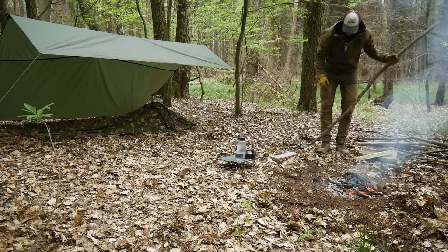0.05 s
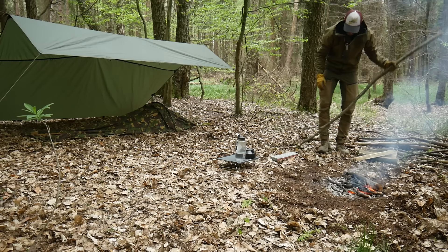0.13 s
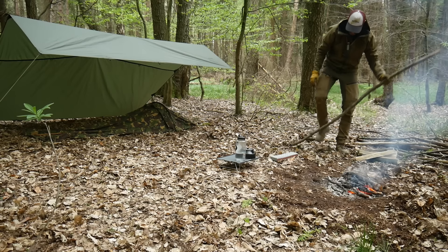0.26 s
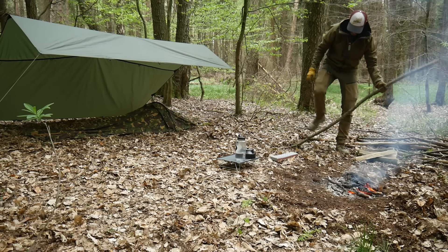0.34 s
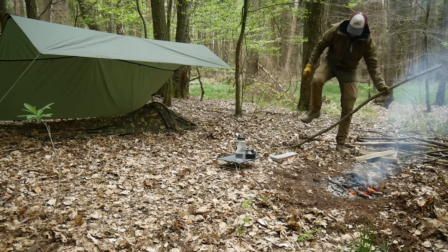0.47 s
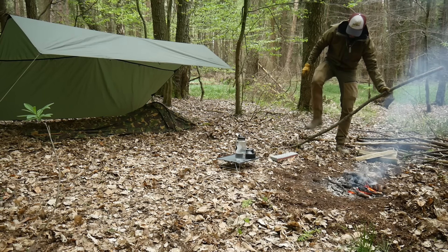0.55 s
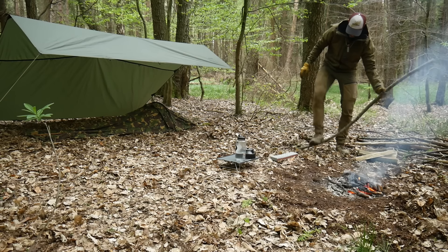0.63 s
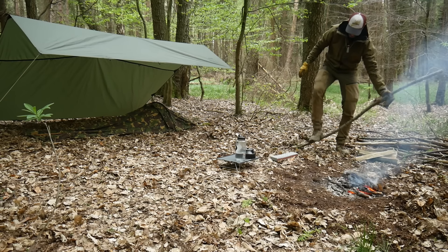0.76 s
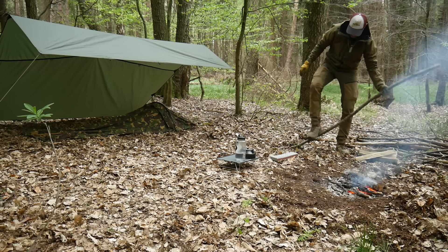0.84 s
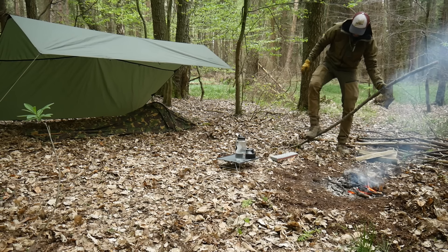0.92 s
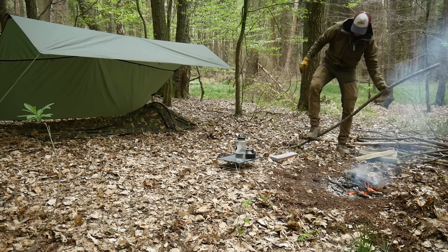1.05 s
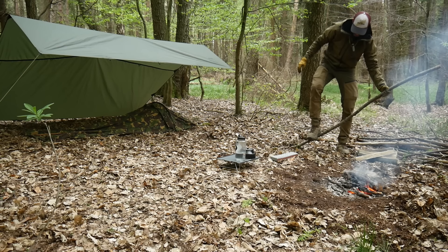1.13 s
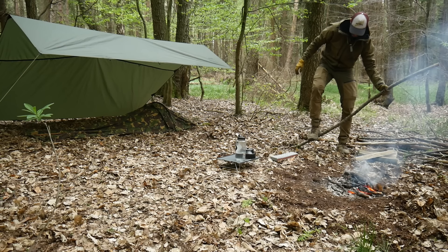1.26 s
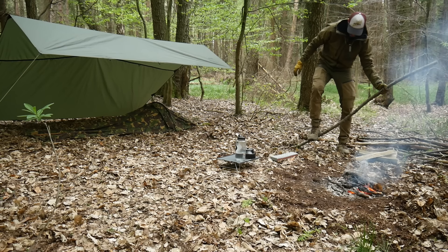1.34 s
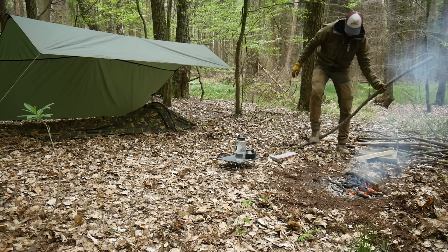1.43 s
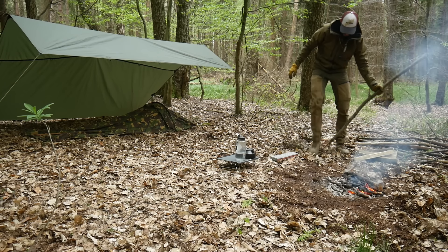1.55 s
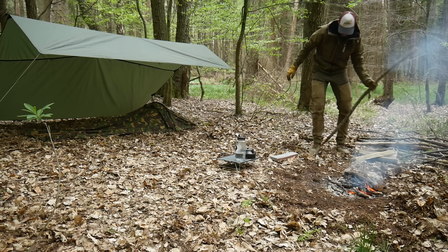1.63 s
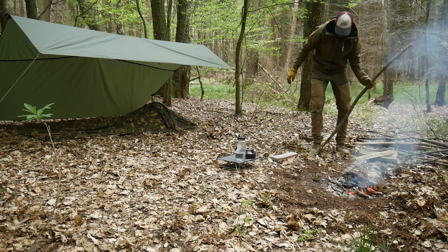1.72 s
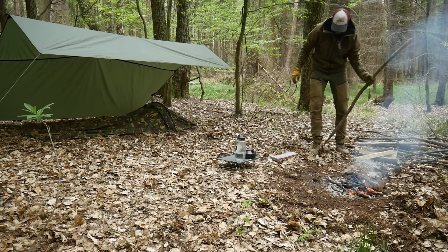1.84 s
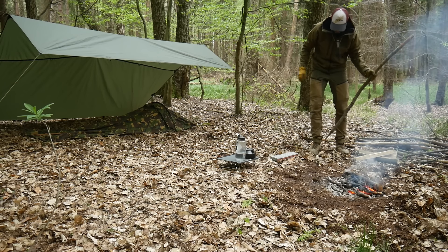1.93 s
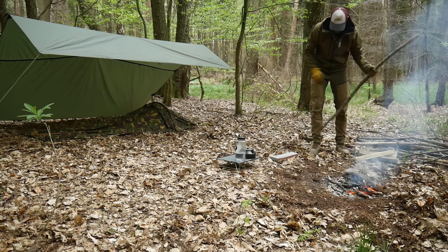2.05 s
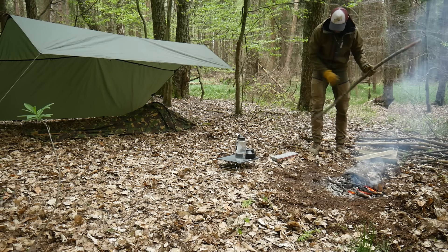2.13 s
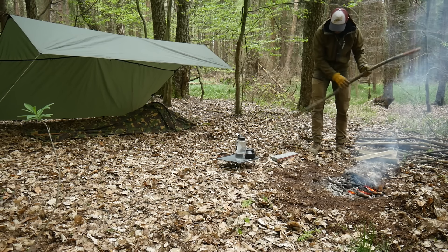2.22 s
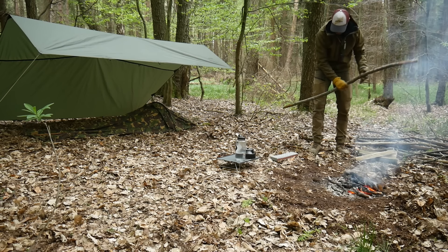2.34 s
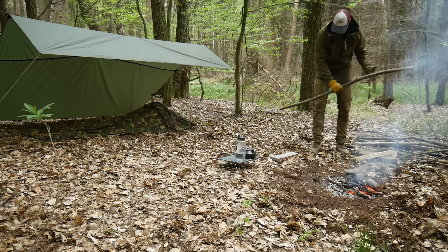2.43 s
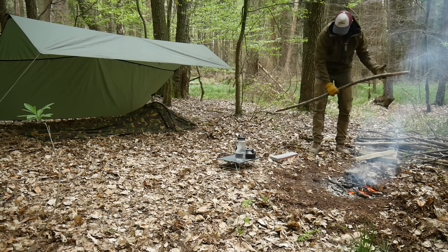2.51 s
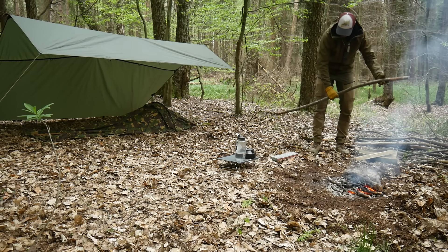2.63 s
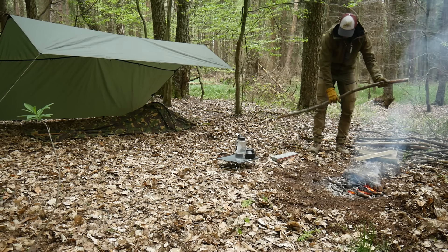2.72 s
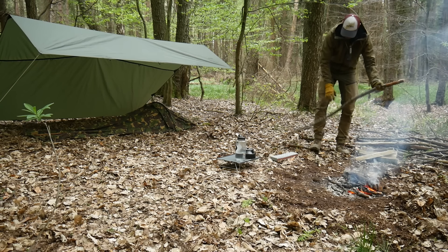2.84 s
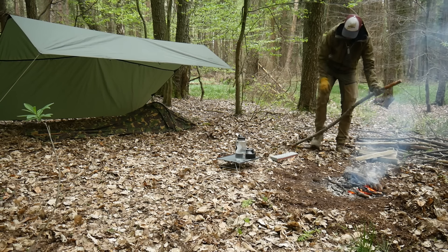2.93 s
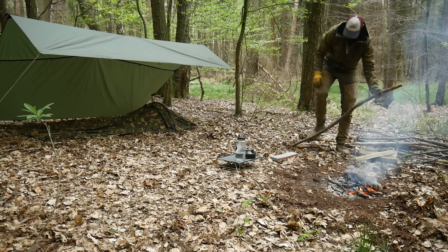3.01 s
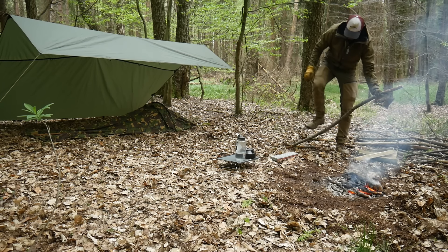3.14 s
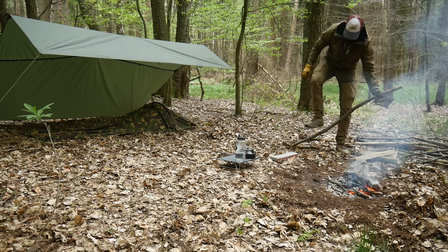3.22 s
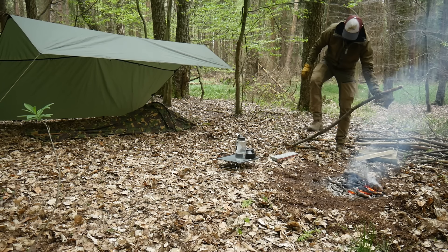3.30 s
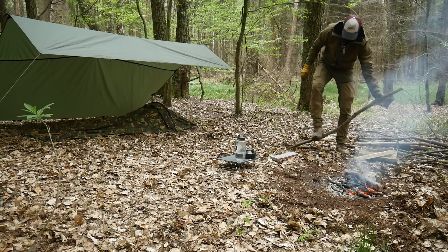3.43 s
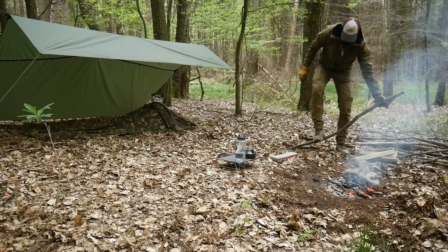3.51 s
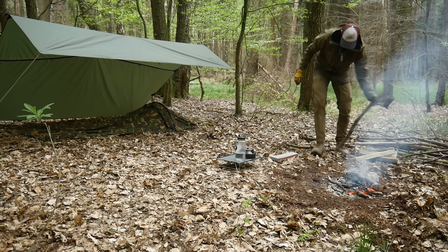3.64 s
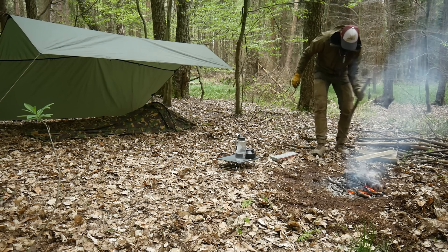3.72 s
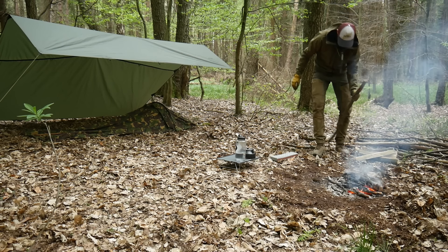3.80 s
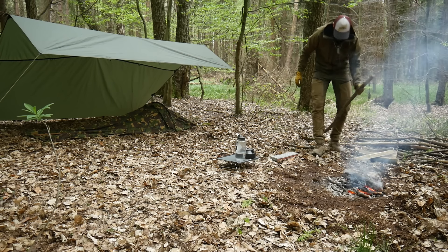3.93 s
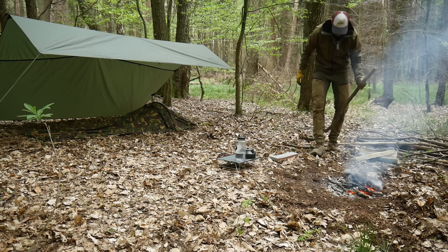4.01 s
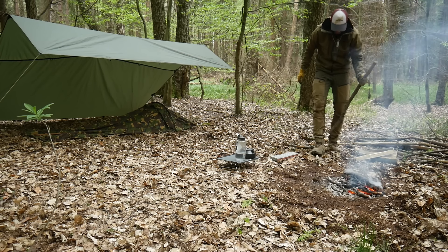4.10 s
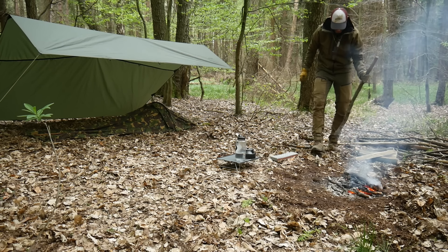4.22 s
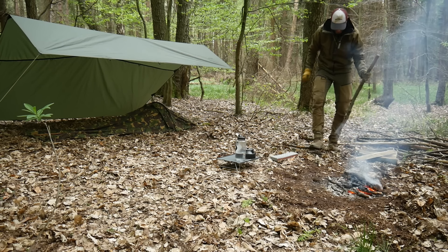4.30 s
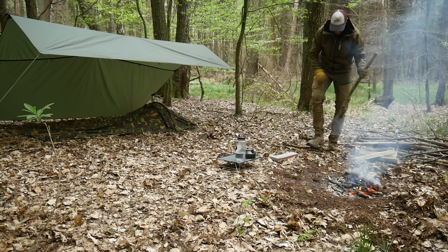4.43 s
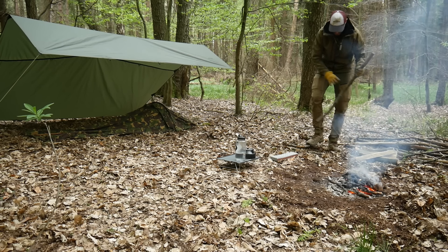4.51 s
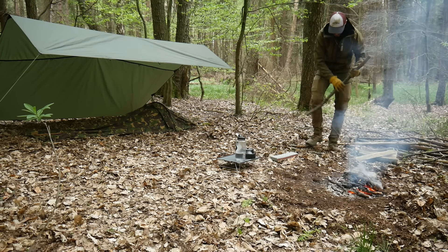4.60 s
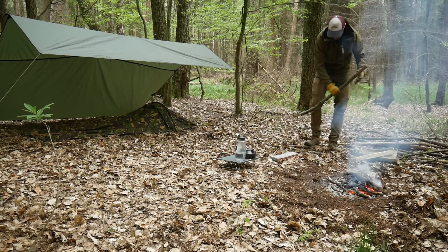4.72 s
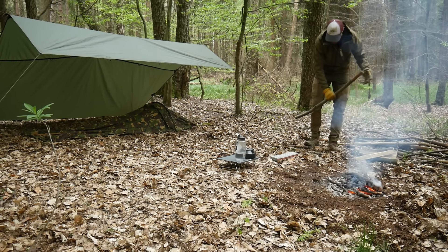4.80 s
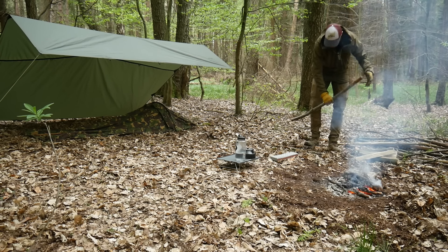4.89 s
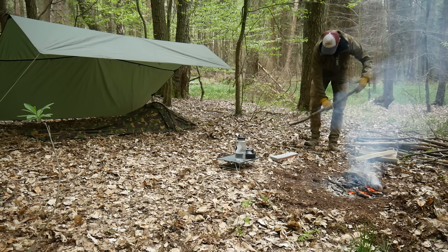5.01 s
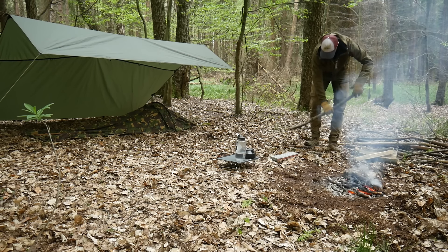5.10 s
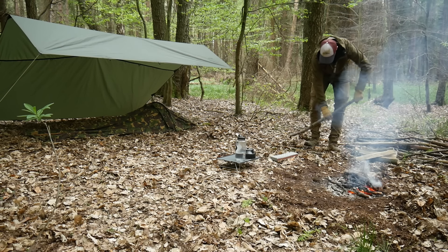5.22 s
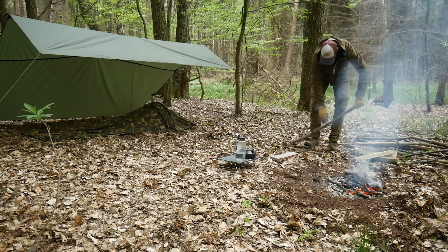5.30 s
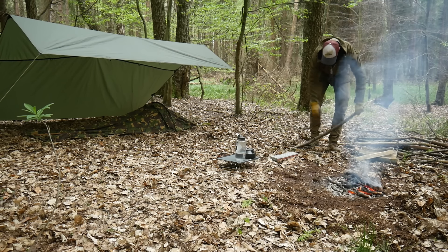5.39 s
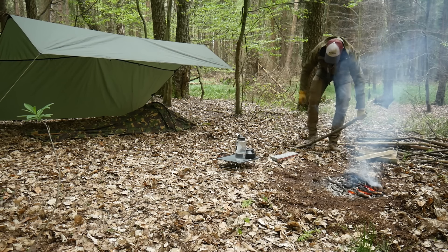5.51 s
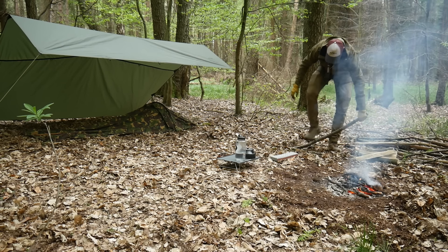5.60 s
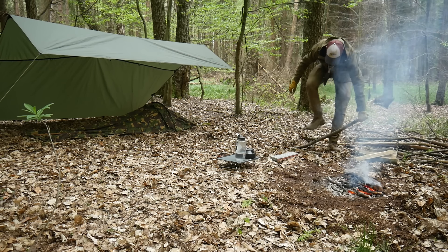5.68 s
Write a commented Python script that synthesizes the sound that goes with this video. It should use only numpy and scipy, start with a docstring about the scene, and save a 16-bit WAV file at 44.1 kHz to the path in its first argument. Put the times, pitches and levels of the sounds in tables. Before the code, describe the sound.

Crisp leaf crackle and a cluster of twig clicks lead to a very loud, dry branch snap that distorts the microphone and rings through the forest. Quieter rustling follows under a small far-off bird's dipping notes and peeps. A second sharp break answers, then footsteps in leaves, light ticks and one last brighter click, over a very soft outdoor air noise.

```python
"""Forest camp: a dry branch is snapped twice under a boot, metres from a microphone whose input overloads.
Leaves shuffle as coloured clicks and noise; twigs tick as noise bursts with a sine ring; boots thud as sagging sines.
A small bird sings V-shaped near-sine notes and short peeps. The snaps ring the broad modes of the branch.
Decaying noise makes the echo from the trunks; steady coloured noise is the air."""
import sys
import numpy as np
from scipy import signal
from scipy.fft import rfft, irfft
from scipy.io import wavfile

SR = 44100
rng = np.random.default_rng(int(sys.argv[2]) if len(sys.argv) > 2 else 0)


def wrap_up_sound(samples):
    """Save the sound to the file named by the first command line argument, as 16-bit audio."""
    columns = np.atleast_2d(samples).T
    # keep every value between -1 and 1, then stretch to whole-number steps
    tamed = np.clip(columns, -1, 1)
    steps = np.round(tamed * 32767).astype(np.int16)
    wavfile.write(sys.argv[1], SR, steps)


N = 253575


def undb(db):
    """Amplitude ratio of a level in dB."""
    return 10 ** (np.asarray(db) / 20)


def level(x, db):
    """Scale x to an rms level in dB."""
    return x * undb(db) / np.sqrt(np.mean(x ** 2))


def colour(x, points):
    """Causal filter that follows (Hz, dB) points, from the folded cepstrum."""
    hz, db = np.transpose(points)
    grid_hz = np.maximum(np.arange(2049) * SR / 4096, 1)
    gain_db = np.interp(np.log(grid_hz), np.log(hz), db)
    cepstrum = irfft(np.log(undb(gain_db)))
    cepstrum[1:2048] *= 2
    cepstrum[2049:] = 0
    impulse = irfft(np.exp(rfft(cepstrum)))
    return signal.fftconvolve(x, impulse)[:len(x)]


def band(x, hz, width_hz):
    """One resonance, gain 1 at its centre."""
    b, a = signal.iirpeak(min(hz, 0.45 * SR), hz / width_hz, fs=SR)
    return signal.lfilter(b, a, x)


def fade(t, t60_s):
    """Exponential decay, 60 dB down after t60_s."""
    return np.exp(-np.log(1000) * t / t60_s)


def add(out, start_s, x):
    """Mix x into out, cut at the end."""
    i = int(start_s * SR)
    out[i:i + len(x)] += x[:len(out) - i]


def grains(count, per_s, spread_db):
    """Random clicks, many small and few large; rms 1."""
    hit = rng.random(count) < per_s / SR
    size = np.minimum(rng.exponential(size=count), 3)
    clicks = hit * rng.standard_normal(count) * undb(spread_db * size)
    return level(clicks + 1e-9, 0)


# Spectrum of the forest air. Each row: frequency in Hz, relative level in dB.
AIR_SPECTRUM = [(18, -16), (30, -8), (65, -4.5), (118, -6), (153, -8), (259, -12.5), (473, -11.5),
                (616, -3.5), (666, -8), (1910, -17), (2060, -11.5), (2230, -17), (6000, -21.5),
                (16000, -25)]
AIR_RMS_DB = -65


def air():
    """Steady noise of the open forest, strongest in the bass and near 600 Hz."""
    return level(colour(rng.standard_normal(N), AIR_SPECTRUM), AIR_RMS_DB)


LEAF_FLICKER_DB, LEAF_FLICKER_HZ = 1, 25


def flicker():
    """Gain that wanders at random: leaves give way unevenly."""
    wander = band(rng.standard_normal(N), LEAF_FLICKER_HZ, 2 * LEAF_FLICKER_HZ)
    return undb(level(wander, 0) * LEAF_FLICKER_DB)


# Shuffles in dead leaves. Each row: peak time in seconds, crackle level in dB, swish level in dB,
# seconds to swell by 20 dB, seconds to die by 20 dB before the layer's stretch (both at least 2 ms).
SHUFFLE_EVENTS = [(0.0, -57.5, -59, .1, 0.2), (.206, -60, -61.5, 0.07, 0.27), (.47, -58.5, -59, 0.4, 0.21),
                  (.608, -66.5, -60, -0.04, 0), (.659, -54, -47, .005, 0.05), (.69, -47, -60, 0.02, 0.05),
                  (.72, -45, -50.5, 0.04, 0.0848), (0.857, -47.5, -61, -0.03, 0.0043),
                  (.946, -66, -63, 0.2, 0), (1.082, -70.5, -68.5, 1, 0.33), (1.53, -66, -66, -0.1, 1.2),
                  (1.585, -61, -63, 0.01, 0), (1.95, -59, -56, 0.05, 0.2), (2.012, -52.5, -59, 0, .02),
                  (2.05, -66, -57, -0.08, 0.46), (2.377, -56.5, -55, 0.68, .07),
                  (2.57, -52, -58.5, 0.06, 0.22), (2.777, -67.5, -62.5, 0.5, .13),
                  (2.876, -63.5, -61, .06, .5), (2.99, -49.5, -53.5, .025, 0.1),
                  (3.115, -57, -58.5, 0.18, 0.12), (3.39, -64.5, -59, 0.16, 0.24),
                  (3.453, -54.5, -57.5, 0.13, -0.3), (3.56, -60.5, -67.5, 0.3, 0.3),
                  (3.64, -59, -65.5, -0.3, -1.8), (3.722, -52.5, -47.5, 0.04, 0.21),
                  (3.85, -61, -60.5, 0.04, 0.4), (3.976, -48.5, -52, 0, 0.27),
                  (4.14, -58, -59.5, 0.96, -0.23), (4.238, -66, -60.5, -0.06, 0.8),
                  (4.31, -61, -76, -0.3, 0.15), (4.423, -59.5, -59.5, 0.2, 0.52),
                  (4.668, -48, -53.5, 0.05, 0.09), (4.709, -51.5, -55, 0.06, 0.05),
                  (4.85, -57.5, -62, 0.15, 0.12), (4.9, -55.5, -58, 0.1, 0.09),
                  (5.12, -72, -62.5, 0.1, 0.2), (5.22, -65.5, -64.5, 0.2, -0.1),
                  (5.3, -61.5, -60, .1, -0.24), (5.434, -63.5, -62, 0.53, 0.5), (5.556, -56, -62, 0, 0.1),
                  (5.59, -64.5, -64, .05, 0.5)]


def shuffling(column, die_stretch):
    """Gain of one leaf layer: every shuffle swells to its peak and dies away; their powers add."""
    t, power = np.arange(0, N + 32, 32) / SR, 0
    for row in SHUFFLE_EVENTS:
        peak_s = row[0]
        swell_s, die_s = np.maximum(row[3:], 0.002) * (1, die_stretch)
        drop = np.where(t < peak_s, (peak_s - t) / swell_s, (t - peak_s) / die_s)
        power = power + undb(row[column] - 20 * drop) ** 2
    return np.interp(np.arange(N) / SR, t, np.sqrt(power)) * flicker()


def leaf_bits(sizes_hz, per_s):
    """Leaf bits of each size crack on their own, every click with a narrow colour."""
    total = 0
    for hz in sizes_hz:
        clicks = band(grains(N, per_s, spread_db=1.0), hz, 0.83 * hz)
        total = total + level(clicks, 10 * np.log10(hz / sizes_hz[-1]))
    return total


# Colour filters of the two leaf layers. Each row: frequency in Hz, relative gain in dB.
CRACKLE_COLOUR = [(500, -26), (1500, -16.5), (3500, -3.5), (5500, -3.5), (8000, -4.5), (10300, -7.5),
                  (13000, -5.5), (16000, -10.5)]
SWISH_COLOUR = [(100, -24.5), (250, -9.5), (600, -3), (900, -2.5), (2000, -5.5), (4000, -8.5),
                (8000, -25.5)]
CRACKLE_DIE_STRETCH, SWISH_DIE_STRETCH = 0.88, 1.6


def leaves():
    """Dense crackle of dry leaves over a duller swish; both follow the boots."""
    crackle = 0.64 * leaf_bits((2560, 4470, 8000, 13300), 620) + 0.67 * rng.standard_normal(N)
    swish = 0.3 * leaf_bits((500, 900, 1600, 2800), 200) + rng.standard_normal(N)
    crackle = shuffling(1, CRACKLE_DIE_STRETCH) * level(colour(crackle, CRACKLE_COLOUR), 0)
    swish = shuffling(2, SWISH_DIE_STRETCH) * level(colour(swish, SWISH_COLOUR), 0)
    return crackle + swish


# Twigs, splinters and leaf stalks breaking. Each row: start in seconds, peak in dB, centre in Hz,
# treble edge in dB before peak scaling, crack t60 in seconds.
TICK_EVENTS = [(0.6038, -35.5, 1540, -25, 0.0082), (0.656, -25, 1140, -5.5, 0.01),
               (0.6594, -24.5, 5300, 1, 0.0084), (0.6693, -29, 7300, 2, 0.01), (0.686, -33, 7300, -2, .008),
               (0.705, -23, 8350, -23, 0.0055), (0.7132, -22, 7600, -10, 0.0085),
               (0.7176, -22.5, 3800, -5, 0.0079), (0.724, -30, 6980, -8, .0045),
               (0.7352, -15.5, 7320, -14, .003), (0.7563, -33.5, 7740, -3, .007),
               (0.8606, -27.5, 3020, -21, 0.015), (0.9224, -46, 9250, -12, .008),
               (1.05, -49, 3920, -6, .009), (1.0818, -39.5, 1060, -4.5, 0.015),
               (1.281, -53, 3550, -12, .008), (1.345, -50, 4560, -14, .005),
               (1.377, -43.5, 3760, -2, 0.0085), (1.41, -54, 4000, -14, .005),
               (1.495, -50, 2540, -23, 0.017), (1.5788, -34, 780, 10, 0.0065),
               (1.5985, -15, 5600, -21, .0055), (1.6066, -2, 2340, -21, 0.0079),
               (1.6298, -15, 3000, 1, .008), (1.6339, -4.5, 2440, -10, 0.0036),
               (1.909, -30, 3930, -9, 0.021), (1.9088, -29.5, 1340, -9.5, 0.025),
               (1.948, -39, 1440, -5.5, .008), (2.0113, -46.5, 2070, 5, 0.0053),
               (2.333, -43.5, 876, -18, 0.029), (2.344, -46.5, 900, -28, 0.02),
               (2.777, -40, 3880, -17, 0.0067), (2.9335, -32.5, 3975, -14, 0.0057),
               (2.975, -26.5, 1770, -32, 0.018), (2.9802, -12.5, 2570, 2.5, 0.01),
               (3.1072, -39, 4530, -8.5, 0.0085), (3.3834, -38.5, 2070, -19, .007),
               (3.6758, -16, 1800, -5, 0.011), (3.7133, -18, 7950, -1, 0.0065),
               (3.7357, -22, 1960, -16, 0.011), (3.7643, -28.5, 2080, -19, 0.011),
               (4.0865, -35, 3356, -11, 0.011), (4.099, -39, 1965, -4.5, .008), (4.108, -39, 998, -5, .01),
               (4.128, -40, 693, -23, .012), (4.149, -41, 1002, -21, .015), (4.241, -39, 6140, -3, 0.0053),
               (4.2644, -42.5, 3990, -15, .008), (4.3089, -41, 8620, -5, .008),
               (4.645, -37, 1000, -7, .008), (4.669, -41, 7990, -8, 0.0087),
               (4.783, -40.5, 8580, -3.5, 0.0056), (4.8029, -38.5, 7910, 0, .008),
               (5.2031, -40, 3310, -9, 0.019), (5.243, -43.5, 7970, 1, 0.013),
               (5.435, -44, 1506, -12, .015), (5.438, -42.5, 1200, -19, .015),
               (5.5502, -20, 3620, 10.5, 0.011), (5.5497, -35, 850, -2, .013)]
FAINT_COUNT, FAINT_DB, FAINT_SPREAD_DB = 30, -53, 3
FAINT_HZ, FAINT_OCTAVES, FAINT_TREBLE_DB, FAINT_T60_S = 4000, 0.5, -12, 0.006


def ticks():
    """A sharp crack with a crumbling tail rings the stalk, with a bright edge; faint ones fall anywhere."""
    out, t = np.zeros(N), np.arange(SR // 20) / SR
    faint = []
    for _ in range(FAINT_COUNT):
        a, b = rng.standard_normal(2)
        db, hz = FAINT_DB + FAINT_SPREAD_DB * a, FAINT_HZ * 2 ** (FAINT_OCTAVES * b)
        faint.append((rng.random() * N / SR, db, hz, FAINT_TREBLE_DB, FAINT_T60_S))
    for start_s, db, hz, treble_db, t60_s in TICK_EVENTS + faint:
        fall = fade(t, np.clip(t60_s, 0.002, 0.06))
        crack = rng.standard_normal(len(t)) * fall
        crack[0] = 4.0  # sharp onset
        ring = level(np.sin(2 * np.pi * hz * t) * fall ** 1.5, -2)
        body = level(band(band(crack, hz, 1.3 * hz), hz, 1.3 * hz), -2.3)
        edge = level(band(crack, 10500, 11000), treble_db)
        tick = ring + body + edge
        add(out, start_s, undb(db) * tick / np.abs(tick).max())
    return out


# Boot and stick ends on soft ground. Each row: start in seconds, level in dB, pitch sagged to in Hz.
THUD_EVENTS = [(0.606, -48, 462), (0.659, -34.5, 250), (0.906, -50, 483), (1.082, -54.5, 450),
               (1.521, -54.5, 179), (1.588, -16, 454), (1.618, -25.5, 348), (1.651, -34.5, 289),
               (1.91, -48, 450), (1.99, -56, 450), (2.51, -58, 280), (2.94, -44.5, 171), (2.96, -49, 196),
               (2.978, -41.5, 580), (3.384, -41.5, 217), (3.472, -44.5, 201), (3.657, -26.5, 333),
               (3.696, -35, 370), (3.709, -28.5, 257), (4.107, -54, 500), (4.15, -56, 490),
               (4.188, -49, 476), (4.241, -53, 496), (4.626, -50, 280.6), (5.551, -41.5, 300)]
THUD_T60_S, SAG_S = 0.038, 0.0028


def thuds():
    """A soft push into the ground: a few cycles that sag in pitch, over a duller shove."""
    out, t = np.zeros(N), np.arange(SR // 5) / SR
    for start_s, db, hz in THUD_EVENTS:
        turns = hz * (t + 0.002 * (1 - np.exp(-t / SAG_S)))
        push = np.sin(2 * np.pi * turns)
        shove = 0.43 * np.sin(2 * np.pi * 0.45 * turns)
        add(out, start_s, undb(db) * fade(t, THUD_T60_S) * (push + shove))
    return out


def tone_db(hz, tilt_db_per_octave, lift_hz, lift_db):
    """Colour of one break: a tilt and a narrow lift that depends on the piece that comes off."""
    lift = lift_db * np.exp(-5 * np.log2(hz / lift_hz) ** 2)
    return tilt_db_per_octave * np.log2(hz / 2500) + lift


# Forest echo by band. Each row: centre in Hz, near trunks t60 in seconds, near level in dB,
# far trunks t60 in seconds, far level in dB (levels before the fade).
FOREST_BANDS = [(89, 0.1, -56, 0.57, -74.5), (183, 0.18, -41, 0.59, -62.5), (340, 0.24, -28.5, 1.5, -58.5),
                (650, 0.09, -20, 1, -43.5), (974, 0.26, -20, 0.17, -36.5), (1530, .2, -12, 1.3, -34.5),
                (2220, 0.22, -12.5, 1.3, -33), (3500, 0.22, -10, 1.1, -32.5),
                (5198, 0.36, -14.5, 0.14, -29.5), (7900, 0.32, -18.5, 0.6, -30),
                (13200, 0.067, -23, .3, -38.5)]


def forest(*tone):
    """Echo of one crack: near trunks return grainy echoes, far ones a smooth wash."""
    t, echo = np.arange(3 * SR // 2) / SR, 0
    near = 0.6 * grains(len(t), 1200, spread_db=2.5) + rng.standard_normal(len(t))
    far = rng.standard_normal(len(t))
    for hz, near_t60_s, near_db, far_t60_s, far_db in FOREST_BANDS:
        for scatter, t60_s, db in ((near, near_t60_s, near_db), (far, far_t60_s, far_db)):
            part = band(band(scatter, hz, 0.9 * hz), hz, 0.9 * hz)
            echo = echo + level(part, db + tone_db(hz, *tone)) * fade(t, t60_s)
    return echo * np.clip(t / 0.008, 0, 1)  # the first trunk stands a step away


# V-shaped notes. Each row: time of the lowest point in seconds, lowest pitch in Hz,
# falling leg in dB, rising leg in dB, length relative to the note shape.
BIRD_NOTES = [(2.488, 2200, -50.5, -51, 0.78), (2.636, 2230, -50.5, -53, 0.67),
              (2.769, 2310, -51, -59, 0.62), (2.905, 2330, -51, -56.5, 0.74), (3.044, 2340, -51, -53, .75),
              (3.184, 2200, -52, -51.5, .85), (3.336, 2120, -50.5, -50.5, 1.05),
              (3.487, 2076, -51.5, -51.5, 1.05), (3.585, 2050, -52, -75.5, 1.23),
              (3.648, 2180, -56.5, -74, .9)]
# Shape of one note. Each row: seconds from the lowest point at length 1, pitch over the lowest as a ratio,
# level in dB.
NOTE_SHAPE = [(-.03, 1.55, -20), (-.022, 1.42, -8), (-.012, 1.28, 0), (0, 1., -13), (.008, 1.28, -2),
              (.018, 1.44, -3), (.03, 1.5, -8), (.036, 1.5, -20)]


def bird_notes():
    """Near-sine notes that fall and rise again; foliage on the way makes them flutter."""
    out, (shape_s, ratio, shape_db) = np.zeros(N), np.transpose(NOTE_SHAPE)
    for low_s, hz, fall_db, rise_db, length in BIRD_NOTES:
        t = np.arange(shape_s[0], shape_s[-1], 1 / (SR * length))
        phase = 2 * np.pi * np.cumsum(hz * np.interp(t, shape_s, ratio)) / SR
        leg_db = np.interp(t, [-0.003, 0.003], [fall_db, rise_db])
        db = np.interp(t, shape_s, shape_db) + leg_db
        add(out, low_s + shape_s[0] * length, np.sqrt(2) * undb(db) * np.sin(phase))
    return out * (1 + level(band(rng.standard_normal(N), 90, 150), -12))


# Short high notes. Each row: start in seconds, nominal pitch in Hz, level in dB before the bird's mix.
PEEP_NOTES = [(1.496, 4330, -67.5), (2.435, 3800, -58), (2.59, 3820, -53.5), (2.716, 4450, -57.5),
              (2.772, 3800, -54), (2.863, 3860, -58), (2.996, 4210, -54), (3.126, 4250, -60.5),
              (3.149, 3770, -55), (3.284, 4330, -59), (3.299, 3760, -57), (3.433, 3810, -57)]
PEEP_S = 0.04


def bird_peeps():
    """Short high sines that each sag and warble."""
    out, u = np.zeros(N), np.arange(0, 1, 1 / (PEEP_S * SR))
    for start_s, hz, db in PEEP_NOTES:
        bend = 1.08 - 0.17 * u + 0.062 * np.sin(25 * u)
        phase = 2 * np.pi * np.cumsum(hz * bend) / SR
        add(out, start_s, np.sqrt(2) * undb(db) * np.sin(np.pi * u) * np.sin(phase))
    return out


def bird():
    """Far-off notes and peeps, so heavily mixed with a grainy unit-energy echo."""
    notes, peeps = bird_notes(), bird_peeps()
    echo = grains(SR, 900, spread_db=2.5) * fade(np.arange(SR) / SR, 1.0)
    echo /= np.sqrt(np.sum(echo ** 2))
    sent = undb(-2) * notes + undb(3) * peeps
    return notes + 0.79 * peeps + signal.fftconvolve(sent, echo)[:N]


# Branch breaks. Each row: start in seconds, level in dB, length of the tearing in seconds,
# treble tilt in dB per octave, favoured frequency in Hz, its lift in dB.
SNAP_EVENTS = [(1.5873, 12, 0.0016, -3, 2866, 6.5), (3.6542, 4, 0.0011, -2, 1910, 6.5)]
# Modes of the branch. Each row: centre in Hz, width in Hz, relative level in dB.
WOOD_MODES = [(770, 650, -12.5), (1265, 360, 2), (1990, 390, -4), (2500, 820, -5.5), (3080, 970, -4.5),
              (4100, 570, -10), (5600, 2000, -6.5), (7900, 3000, -9), (13200, 2800, -12.5)]
SNAP_ECHO_DB, TEARING_T60_S = -18, 0.013


def snaps():
    """Fibres let go in a burst of a few ms that rings the broad modes of the branch; the forest answers."""
    out, t = np.zeros(N), np.arange(SR // 10) / SR
    for start_s, db, tear_s, *tone in SNAP_EVENTS:
        envelope = np.where(t < tear_s, 1, fade(t - tear_s, TEARING_T60_S))
        tearing = rng.standard_normal(len(t)) * envelope
        ring = 0
        for hz, width_hz, mode_db in WOOD_MODES:
            # each mode takes the share of the burst's energy that its width gives it
            share_db = 10 * np.log10(np.mean(tearing ** 2) * np.pi * width_hz / SR)
            ring = ring + level(band(tearing, hz, width_hz), mode_db + share_db + tone_db(hz, *tone))
        add(out, start_s, undb(db) * ring)
        add(out, start_s, undb(db + SNAP_ECHO_DB) * forest(*tone))
    return out


SMALL_ECHO_DB = -37.5


def scene():
    """Sum of all layers; ticks and thuds share one untilted forest echo."""
    small = ticks() + thuds()
    small_echo = undb(SMALL_ECHO_DB) * signal.fftconvolve(small, forest(0, 1000, 0))[:N]
    return (air() + leaves() + small + small_echo + bird() + snaps())[None]


# Microphone response. Each row: frequency in Hz, gain in dB.
MIC_RESPONSE = [(6000, -0.13), (8300, 4.5), (10400, -5.5), (13000, -2.5), (16000, -4.5)]
CLIP_LEVEL, BASS_CUT_HZ, TOP_CUT_HZ = 0.82, 120, 15900


def record(dry):
    """A treble peak and dip in the microphone; the input clips its peaks; bass and top are cut."""
    heard = np.clip(colour(dry[0], MIC_RESPONSE), -CLIP_LEVEL, CLIP_LEVEL)
    bass_cut = signal.butter(2, BASS_CUT_HZ, "high", fs=SR, output="sos")
    top_cut = signal.ellip(12, 0.2, 85, TOP_CUT_HZ, fs=SR, output="sos")
    return signal.sosfilt(top_cut, signal.sosfilt(bass_cut, heard))[None]


dry = scene()
out = record(dry)
wrap_up_sound(out)
```